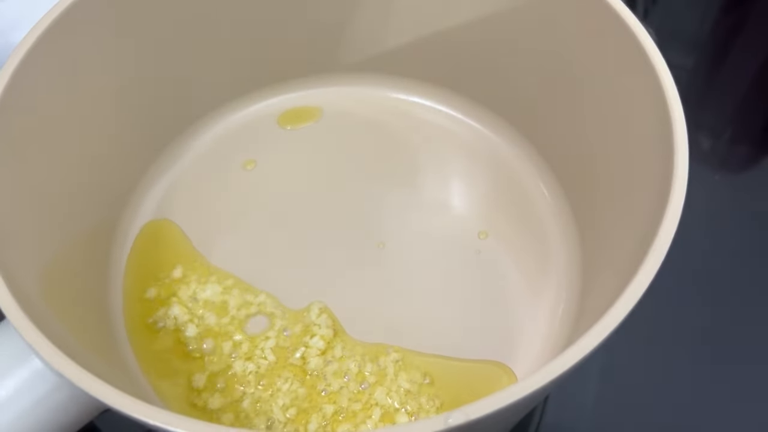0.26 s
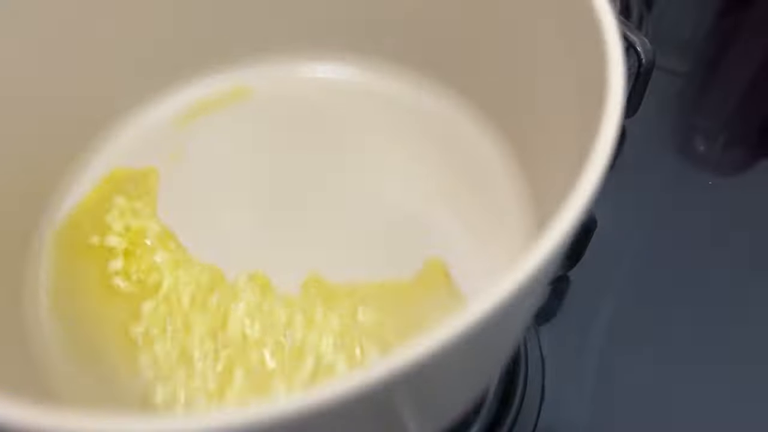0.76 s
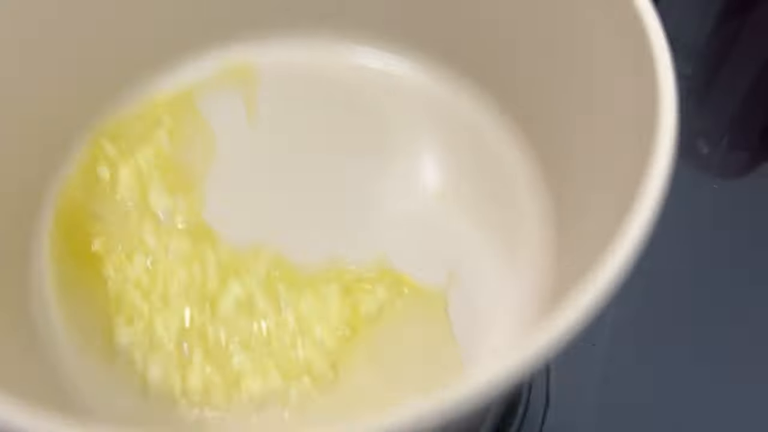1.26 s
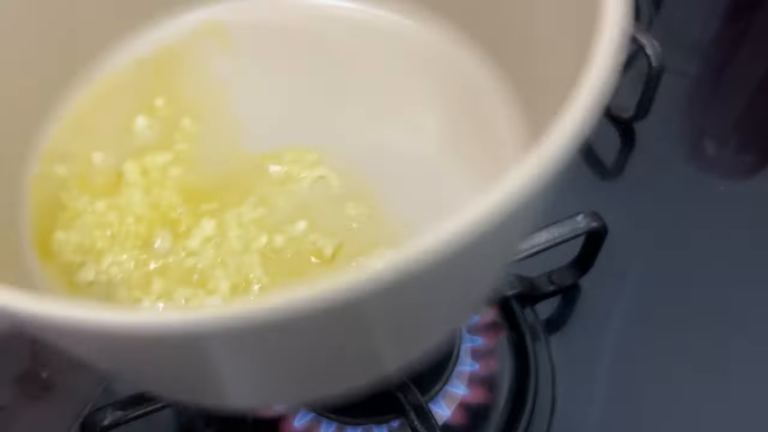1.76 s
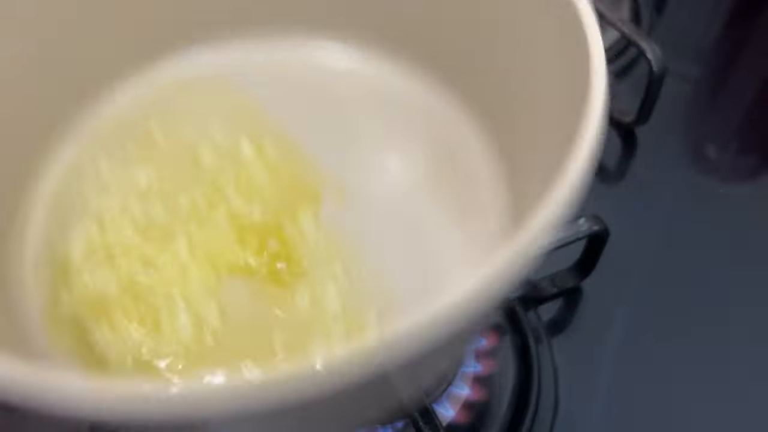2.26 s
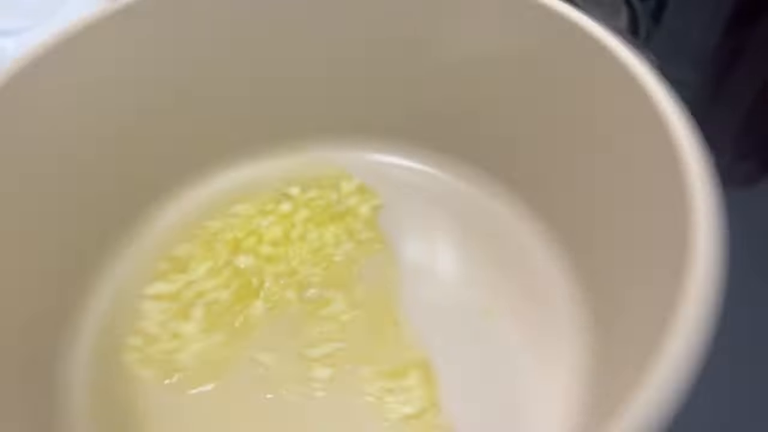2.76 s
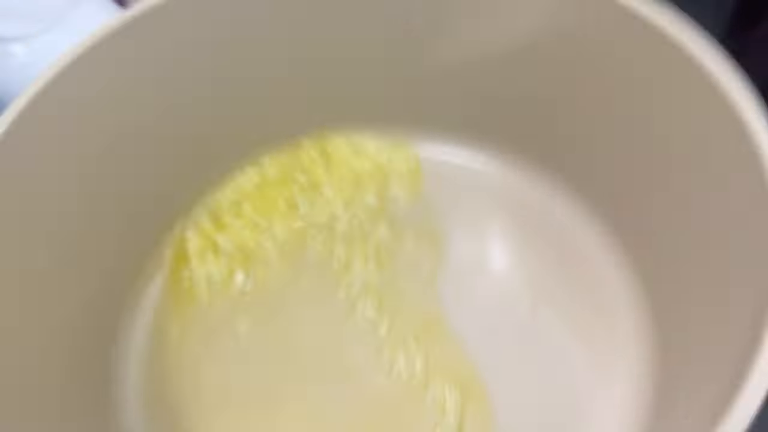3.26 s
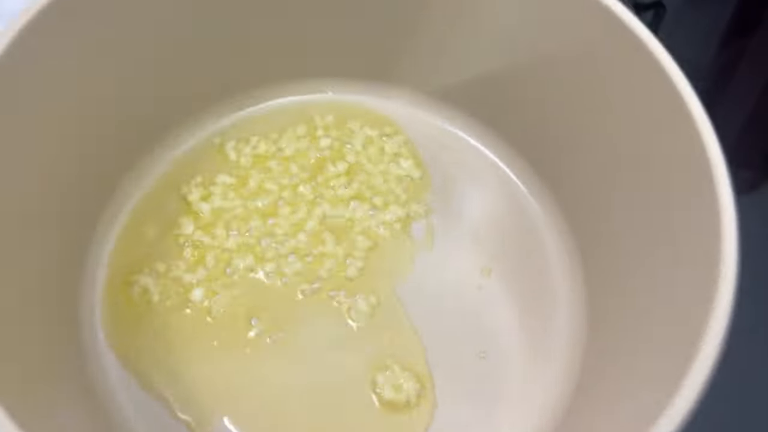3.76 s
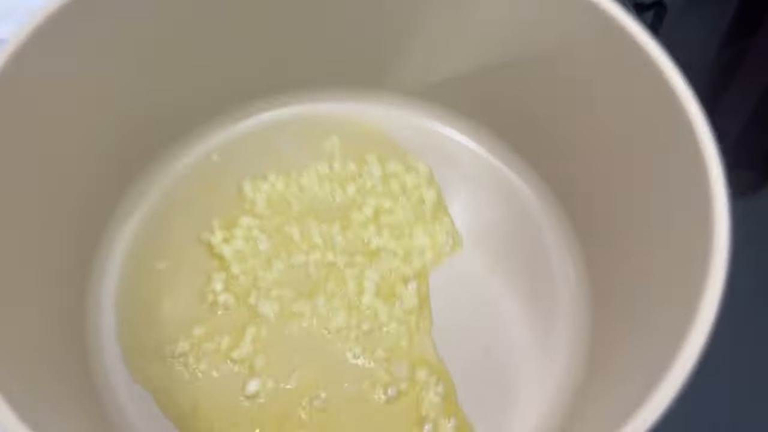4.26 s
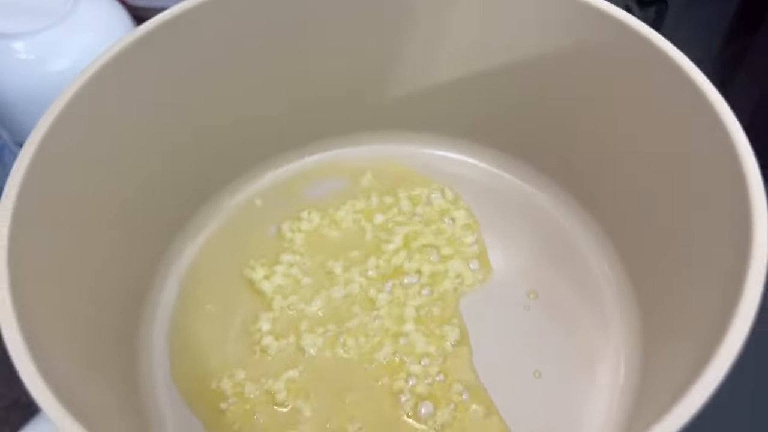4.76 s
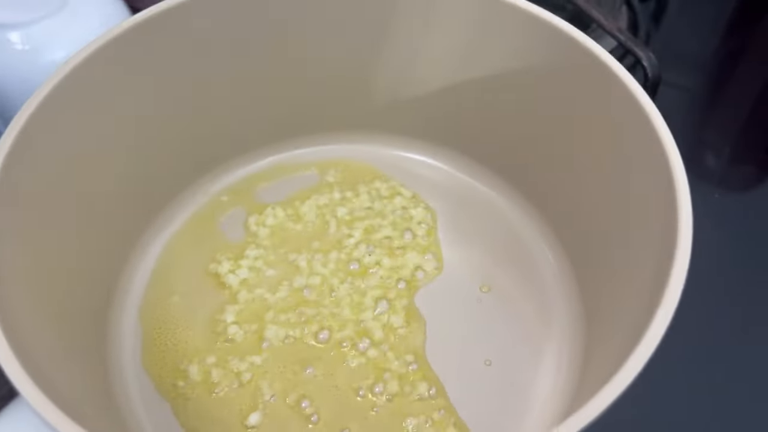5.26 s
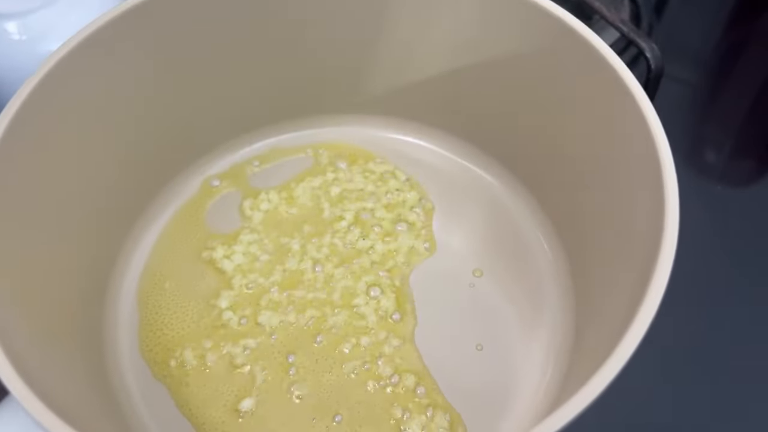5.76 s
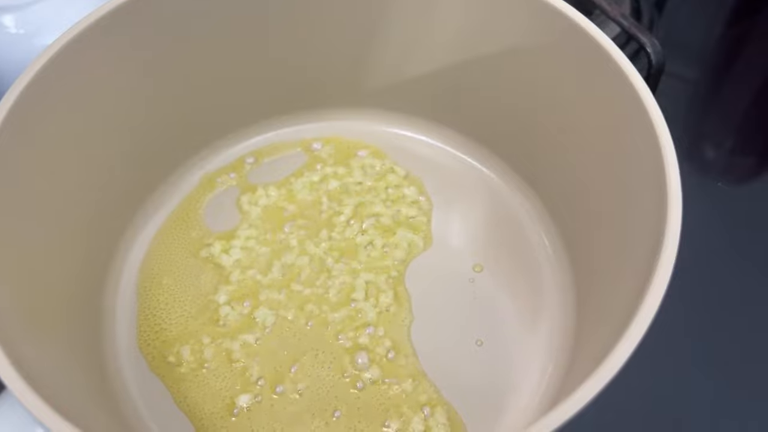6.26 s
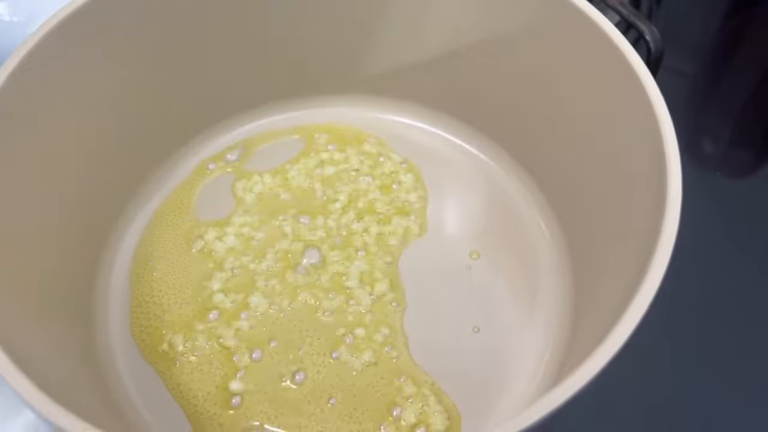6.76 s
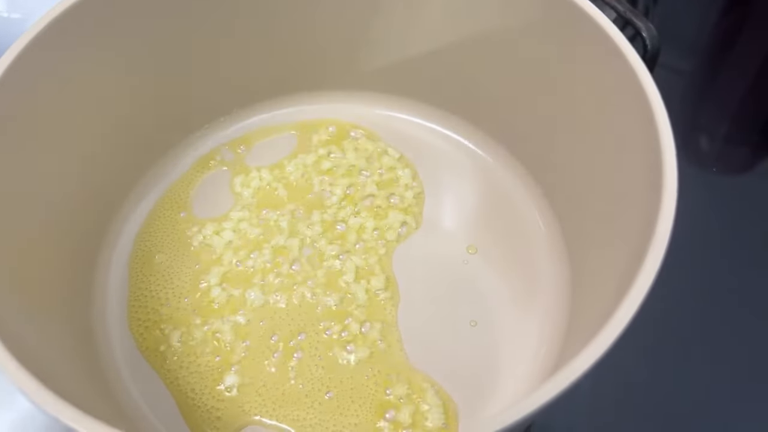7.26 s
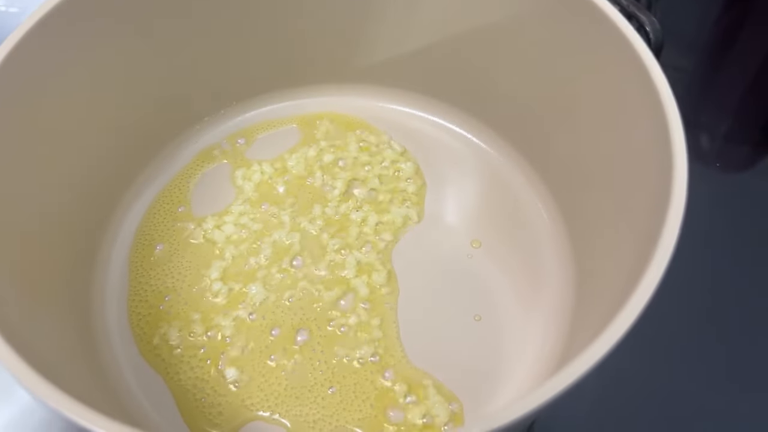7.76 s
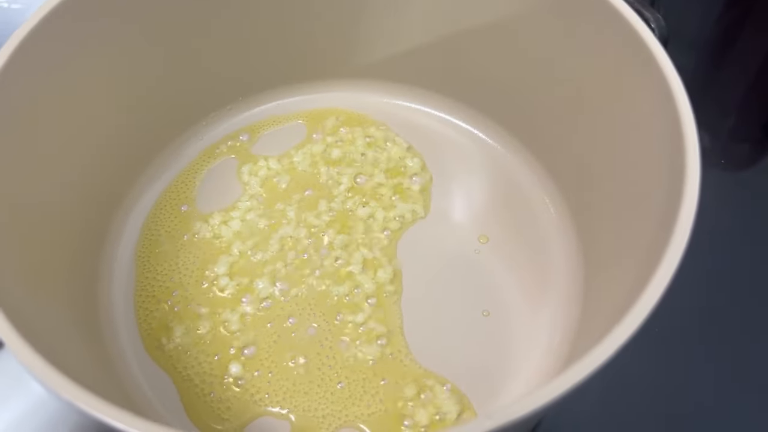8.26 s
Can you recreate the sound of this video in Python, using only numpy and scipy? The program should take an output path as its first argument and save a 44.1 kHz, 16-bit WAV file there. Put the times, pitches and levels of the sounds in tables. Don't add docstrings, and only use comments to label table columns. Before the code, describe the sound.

Minced garlic sizzles in hot oil in a swirled pot, hiss swelling with sharp spits, then the pot clanks onto the stove and fries steadily.

```python
import sys
import numpy as np
from scipy import signal
from scipy.fft import rfft, irfft, next_fast_len
from scipy.io import wavfile
from scipy.ndimage import uniform_filter1d

SR = 44100
rng = np.random.default_rng(int(sys.argv[2]) if len(sys.argv) > 2 else 0)


def linear_from_db(decibels):
    return 10 ** (np.asarray(decibels, float) / 20)


def store_pcm(level_fs):
    pcm = np.round(np.clip(level_fs, -1, 1) * 32767).astype(np.int16)
    wavfile.write(sys.argv[1], SR, np.atleast_2d(pcm).T)


N = 376163


def evened(x):
    return x / np.sqrt(np.mean(abs(x) ** 2) + 1e-20)


def read(points, hz):
    f, value = np.transpose(points)
    return np.interp(np.log(hz + 1), np.log(f + 1), value)


def bell(hz, f, width):
    return 1 / (1 + (2 * (hz - f) / width) ** 2)


def add(mix, s, sound):
    part = mix[round(s * SR):][:len(sound)]
    part += sound[:len(part)]


def blow(hz, contact_s):
    t = np.arange(SR // 10) / SR
    u = t / max(contact_s, .00003)
    return u * np.exp(1 - u) * np.sin(2 * np.pi * (hz * t + rng.random()))


def bursts(per_s, spread_db, cycles):
    out = np.zeros((2, N))
    for hz in np.geomspace(700, 17000, num=18):
        bubble = blow(hz, cycles / hz)[:2000]
        size = linear_from_db(spread_db * np.minimum(rng.exponential(1, (2, N)), 5))
        sign = rng.choice([-1., 1.], (2, N))
        bursting = rng.random((2, N)) < per_s * hz / 8000 / SR
        train = size * sign * bursting
        out += signal.oaconvolve(train, bubble[None] / np.linalg.norm(bubble), axes=1)[:, :N]
    return evened(out)


# t/s, fizz level/dB, shaking/0-1, finest spray level/dB
HEAT = [(0.0, -35.5, 1.53, -11), (0.5, -34.5, 1.6, -12), (0.75, -31, 1, -14.5), (1.45, -29, 1, -12),
        (1.8, -26, 1, -13), (2.35, -25.5, 0.96, -12.5), (2.65, -23, .9, -12.5), (3.2, -23, 0.8, -12.5),
        (3.6, -21, 0.73, -10), (4.2, -21.5, 0.42, -11), (4.8, -22.5, 0.14, -11), (5.5, -22.5, 0.13, -12),
        (6.35, -24.5, 0.08, -12.5), (6.7, -21.5, 0, -13), (7.6, -21.5, 0, -12.5), (8.53, -22.5, 0, -12.5)]
# peak t/s, small-bubble lift/dB, large-bubble lift/dB, half length/s
SWIRLS = [(0.635, 5.5, 2.5, 0.039), (0.86, 2.5, 5.5, .12), (1.135, 2.5, 6, .06), (1.31, 4.5, 5, 0.1),
          (1.493, -2.5, -1.5, 0.044), (1.618, 4.5, 3.5, 0.078), (1.904, 4, 4, 0.096),
          (2.127, 4.5, 4.5, 0.051), (2.225, 5.5, 6, .06), (2.50, 6, 4, 0.11), (2.72, 0, 4, .03),
          (2.81, 4, 4.5, .07), (3.063, 1.5, 4.5, 0.064), (3.295, 1.5, 5.5, 0.076), (3.41, 2.5, 1.5, .06),
          (3.725, -0.5, -2, 0.043), (3.936, 3, 1, 0.065), (4.28, 1.5, 1.5, 0.093), (4.453, 3, 2, .07),
          (4.616, 2, 2, 0.065), (4.916, 1, -1.5, 0.094), (6.18, 2, 1.5, 0.12), (6.58, 2.5, 1.5, 0.056),
          (6.872, 1, 2, 0.035), (7.17, 1.5, -0.5, .1)]
SIZES_HZ = [
    1300,
    2500,
    4200,
    6500,
    9300,
    11500,
]
LARGE_DB, LARGE_SHAKEN_DB = -17.5, 8.5
MIDDLING_DB, MIDDLING_SHAKEN_DB = -10, 4
MIDDLING_SWIRL = 0.52


def bubble_levels(hz, t):
    when, *columns = np.transpose(HEAT)
    heat_db, shaking, finest_db = (np.interp(t, when, c) for c in columns)
    s, small_lift_db, large_lift_db, half_s = np.transpose(SWIRLS)
    wave = np.exp(-((t - s[:, None]) / half_s[:, None]) ** 2)
    small_db = heat_db + small_lift_db @ wave
    large_db = heat_db + LARGE_DB + LARGE_SHAKEN_DB * shaking + large_lift_db @ wave
    swirl_db = (MIDDLING_SWIRL * large_lift_db + 0.44 * small_lift_db) @ wave
    middling_db = heat_db + MIDDLING_DB + MIDDLING_SHAKEN_DB * np.minimum(shaking, 1) + swirl_db
    simmer_db = 0.69 * small_db + .3 * large_db + 1.0
    spray_db = small_db + finest_db + 10.0
    levels_db = np.array([simmer_db, large_db + 12.0, middling_db + 10.0, small_db, small_db, spray_db])
    shares = np.array([np.interp(hz, SIZES_HZ, row) for row in np.eye(len(SIZES_HZ))])
    return shares.T @ levels_db, shaking


def drift(shape, bands, frames):
    rough = rng.standard_normal(shape)
    return evened(uniform_filter1d(uniform_filter1d(rough, size=bands, axis=0), size=frames, axis=1))


# f/Hz, level/dB per Hz
FIZZ = [(400, -27), (900, -12), (1900, -20), (2900, -8), (4400, -9), (6000, -5.5), (7600, -1), (9800, -0.5),
        (10800, -1), (12000, -10.5), (13000, -7), (14000, -10), (15600, -8), (17000, -11)]
# f/Hz, width/Hz, lift/dB
POT_AIR = [(724, 120, 8), (1558, 144, 10), (2353, 130, 9), (2690, 120, -2), (3900, 114, 5), (4840, 180, 3)]


def fizz(grain=0.68, patchy_db=0.72, flicker_db=0.46, surge_db=0.6):
    blur = np.sqrt(1 - min(grain, .99) ** 2) * rng.standard_normal((2, N))
    source = grain * bursts(900, 1.84, 1.36) + blur
    hz, t, z = signal.stft(source, SR, nperseg=256, noverlap=192)
    field_db, shaking = bubble_levels(hz, t)
    shape = len(hz), len(t)
    field_db = field_db + patchy_db * drift(shape, 8, 24)
    field_db += flicker_db * drift(shape, 24, 8)
    field_db += surge_db * (0.4 + shaking) * drift(shape, 40, 40)
    shaped = signal.istft(z * linear_from_db(field_db), SR, nperseg=256, noverlap=192)[1][:, :N]
    size = next_fast_len(N)
    fine = np.fft.rfftfreq(size, 1 / SR)
    pot_db = sum(db * bell(fine, f, width) for f, width, db in POT_AIR)
    colour = linear_from_db(read(FIZZ, fine) + pot_db)
    return linear_from_db(9.5) * irfft(rfft(shaped, size) * colour, size)[:, :N]


# t/s, peak level/dB, bubble f/Hz
SPITS = [(0.0277, -15, 8750), (0.4583, -12, 8150), (0.5072, -13, 6100), (0.5615, -10.5, 6880),
         (1.5893, -6, 8780), (1.6981, -8, 8040), (2.1429, 4.5, 10250), (2.503, 2, 8040), (2.704, 0, 8100),
         (2.8113, -2, 8010), (3.0905, -1, 8450), (3.2529, -3, 9410), (3.3751, -6, 8230), (3.3928, -4, 8590),
         (3.6368, 0, 9310), (3.6497, -4, 7730), (3.9159, -3, 8350), (3.9279, -3, 9180), (3.9868, 4, 8670),
         (3.9887, -4, 8200), (4.055, 0, 10640), (4.5373, -3, 9250), (4.6133, -6, 8000), (4.9127, -1, 7900),
         (6.0823, -4, 8500), (6.6651, -6, 7770), (6.8584, -3, 8080), (7.684, -1, 7580), (8.1523, -4, 8030)]
SMALL_PER_S, SMALL_DB, SMALL_SPREAD_DB, SMALL_LOW_HZ, SMALL_HIGH_HZ = 24, 10.5, 2, 5000, 11000


def spits():
    out = np.zeros(N)
    when, size, pitch = rng.random((round(SMALL_PER_S * N / SR), 3)).T
    when = .001 + when * N / SR
    fizz_db = np.interp(when, *np.transpose(HEAT)[:2])
    small_db = fizz_db + SMALL_DB - SMALL_SPREAD_DB * np.log(size + .05)
    small = zip(when, small_db, SMALL_LOW_HZ + (SMALL_HIGH_HZ - SMALL_LOW_HZ) * pitch)
    for s, db, hz in list(SPITS) + list(small):
        add(out, s - .0003, linear_from_db(db - 3.0) * blow(hz, 0.00024))
        add(out, s + 0.0014, linear_from_db(db - 13) * blow(0.97 * hz, 0.00028))
    return out


# t/s, peak level/dB, base f/Hz, upper modes level/dB and wall ring level/dB re base
KNOCKS = [(.303, -27, 674, -20, -22), (.312, -25, 670, -20, -15), (.331, -27, 666, -14, -14),
          (.357, -27, 597, -8, -21), (.370, -29.5, 700, -12, -1), (5.2096, -11.5, 633, -7, -28),
          (5.221, -27, 700, 0, -25), (5.266, -14, 682, -6.5, -20), (5.298, -15, 690, -10, -27),
          (5.315, -23, 650, -2, -21), (5.33, -29, 600, -2, -20), (5.639, -20.5, 740, -8, -13),
          (5.794, -15, 700, -15, -17.5), (5.809, -30, 732, -11, -30)]
# f/Hz, level/dB re upper level, share of the contact time
UPPER = [(330, -3, 0.83), (875, -3.5, 0.53), (1180, -1.5, 1), (1587, -12, 0.88)]
# f/Hz, level/dB re wall ring, t60/s
WALL = [(1276, 2, 0.19), (1590, -12, .08)]
SOFT_S, SOFT_DB, HARDER_S = .0055, -29, .00013


def knocks():
    out, t = np.zeros(N), np.arange(SR // 4) / SR
    for s, db, hz, upper_db, wall_db in KNOCKS:
        contact_s = SOFT_S - HARDER_S * (db - SOFT_DB)
        upper = sum(linear_from_db(upper_db + lift_db) * blow(f, share * contact_s) for f, lift_db, share in UPPER)
        add(out, s, linear_from_db(db + 1.5) * (blow(hz, contact_s) + upper))
        for f, lift_db, t60 in WALL:
            ring = np.minimum(t / 0.0064, 1) * np.sin(2 * np.pi * (f * t + rng.random()))
            add(out, s, linear_from_db(db + 3.5 + wall_db + lift_db - 60 * t / t60) * ring)
    return out


# t/s, peak level/dB
CLANK = (5.5925, -4)
# f/Hz, level/dB, contact time/s
METAL = [(450, -12, 0.001), (735, -12.5, .011), (1090, -14, 0.0029), (1270, -21, 0.01), (1650, -26, 0.011),
         (1980, -15, 0.0022), (2430, -3, 0.0028), (2580, -28, 0.006), (3400, -22, .0015),
         (4450, -15.5, 0.0032), (6020, -3.5, 0.003)]


def clank():
    out, (s, peak_db) = np.zeros(N), CLANK
    add(out, s, linear_from_db(peak_db) * sum(linear_from_db(db) * blow(hz, contact_s) for hz, db, contact_s in METAL))
    return out


# t/s, peak level/dB, f/Hz
THUMPS = [
    (5.227, -14, 80.7),
    (5.261, -17, 78.1),
    (5.291, -16, 70.0),
    (5.32, -23, 105),
]


def thumps():
    out = np.zeros(N)
    for s, db, hz in THUMPS:
        add(out, s, linear_from_db(db - 5.0) * blow(hz, .008))
    return out


SLIDE_S, SLIDE_HOLD_S, SLIDE_FADE_S = 5.35, 0.044, .045
SLIDE_HZ, SLIDE_CLIMB, SLIDE_DB, SLIDE_FADE_DB = 705, 600, -18, -10


def squeak():
    t, out = np.arange(0, SLIDE_HOLD_S + SLIDE_FADE_S, 1 / SR), np.zeros(N)
    judder = 1 + 0.15 * evened(uniform_filter1d(rng.standard_normal(len(t)), size=300))
    tone = np.sin(2 * np.pi * np.cumsum(SLIDE_HZ + SLIDE_CLIMB * t) / SR)
    level_db = SLIDE_DB + SLIDE_FADE_DB * np.maximum(t - SLIDE_HOLD_S, 0) / SLIDE_FADE_S
    add(out, SLIDE_S, linear_from_db(level_db) * judder * tone * signal.windows.tukey(len(t), .15))
    return out


# t/s, level/dB
FLAME_DB = [(0.0, -32), (0.85, -30), (2.45, -30), (3.9, -31), (5.4, -31), (6.3, -33), (8.53, -32)]
# f/Hz, level/dB per Hz
FLAME = [(18, -41), (30, -11), (53, -3.5), (87, -3), (124, 1), (198, -10.5), (333, -10.5), (437, -17),
         (582, -19), (625, -19.5), (684, -18), (1190, -28.5), (1510, -22.5), (1940, -26), (2200, -25),
         (2860, -46), (4840, -120)]
# f/Hz, width/Hz, level/dB re flame
HOOD = [(55.6, 5.3, -11), (118.5, 8.7, -8), (263, 17, -13), (336.4, 14, -17), (1526, 63, -18),
        (2333, 110, -16.5)]


def flame():
    size = next_fast_len(N)
    hz, t = np.fft.rfftfreq(size, 1 / SR), np.arange(N) / SR
    roar = evened(linear_from_db(read(FLAME, hz)) / (1 + (40 / (hz + 1)) ** 7))
    tones = sum(linear_from_db(db) * evened(bell(hz, f, width)) for f, width, db in HOOD)
    noise = irfft(rfft(rng.standard_normal((2, size))) * np.hypot(roar, tones), size)[:, :N]
    return linear_from_db(np.interp(t, *np.transpose(FLAME_DB)) + 0.16) * noise


def kitchen(x, t60=0.36):
    t = np.arange(SR // 3) / SR
    sparse = rng.choice([-1., 1.], len(t)) * (rng.random(len(t)) < .05)
    taps = sparse * linear_from_db(-60 * t / t60) * (t > .002)
    return signal.fftconvolve(x, taps / np.linalg.norm(taps))[:N]


# f/Hz, likeness/0-1, right lead/rad, left over right level/dB
PORTS = [(60, 1, 0, -0.5), (160, .97, 0.23, 1.7), (304, 0.92, -0.75, 0.5), (700, 0.59, 0.36, 5.5),
         (1490, 0.65, 1.03, 4), (2326, 0.54, -0.5, 4), (2560, .55, -2.5, 4), (3240, 0.47, 0.07, 3.5),
         (4400, 0.79, 0.87, 2), (5500, 0.93, -1.45, 6.5), (6500, 0.99, 1, 3.5), (7400, 0.75, 0.5, 3.5),
         (8450, 1, -0.56, 1), (10000, .99, 0.33, -0.1)]
LEAD_FROM_HZ, TURN_HZ = 8430, 3590


def ports(direct, scattered):
    size = next_fast_len(N + 4096)
    hz, (f, *columns) = np.fft.rfftfreq(size, 1 / SR), np.transpose(PORTS)
    like, lead, left_db = (np.interp(hz, f, c) for c in columns)
    lead = np.where(hz < LEAD_FROM_HZ, lead, 2 * np.pi * (hz - LEAD_FROM_HZ) / TURN_HZ)
    like = np.clip(like, 0, 1)
    left = rfft(direct, size)
    right = like * np.exp(1j * lead) * left + np.sqrt(1 - like ** 2) * rfft(scattered, size)
    return irfft(np.array([left * linear_from_db(left_db / 2), right * linear_from_db(-left_db / 2)]), size)[:, :N]


def scene():
    steady, drops = fizz() + flame(), spits()
    metal = knocks() + clank() + thumps() + squeak()
    tail, scatter = linear_from_db(-13) * kitchen(metal), linear_from_db(-3.5) * kitchen(metal, t60=0.028)
    direct = steady[0] + drops + metal + tail
    scattered = steady[1] + scatter + linear_from_db(2.0) * kitchen(drops, t60=0.031)
    return ports(direct, scattered)


# t/s, level/dB
DUCKS = [
    (2.15, -1.5),
    (2.708, -3),
    (3.992, -3),
    (5.612, -4),
]
RECOVER_S = .17


def gain_control(x):
    t = np.arange(N) / SR
    duck_db = sum(db * np.clip((t - s) / 0.0031, 0, 1) * np.exp(-abs(t - s) / RECOVER_S) for s, db in DUCKS)
    return x * linear_from_db(duck_db)


def band_limit(x):
    return signal.sosfilt(signal.butter(12, 15900, fs=SR, output="sos"), x)


def record(dry):
    overloaded = np.clip(gain_control(dry), -1.1, 1.1)
    edge = signal.firwin(1023, 15740, window=("kaiser", 9), fs=SR)
    mix = signal.oaconvolve(overloaded, edge[None], "same")
    return band_limit(mix)


dry = scene()
out = record(dry)
store_pcm(out)
```